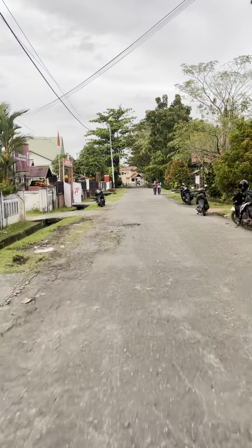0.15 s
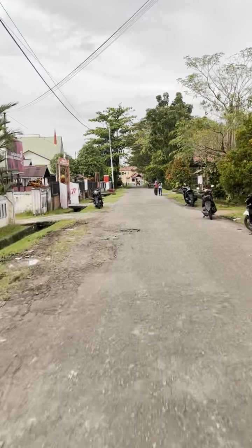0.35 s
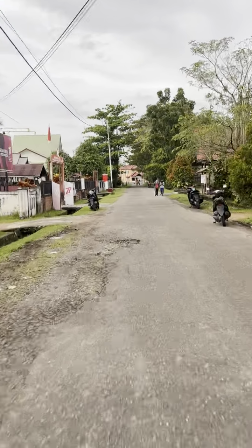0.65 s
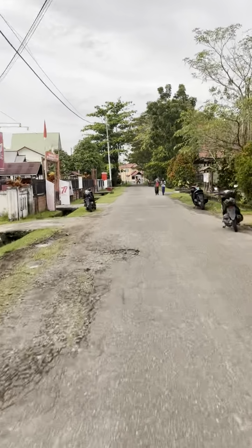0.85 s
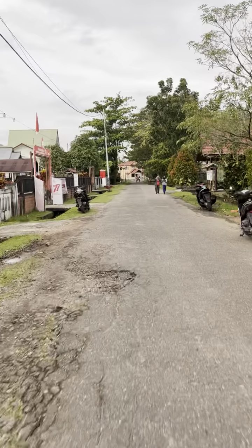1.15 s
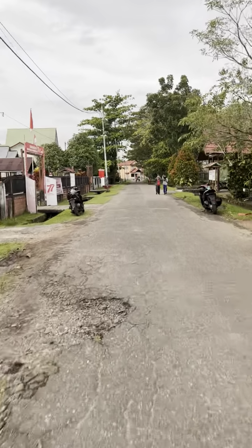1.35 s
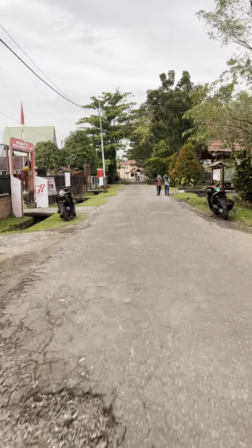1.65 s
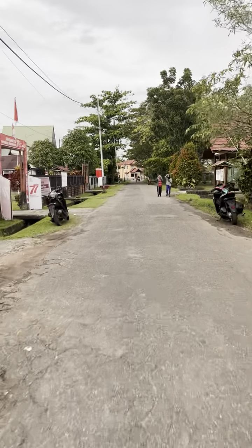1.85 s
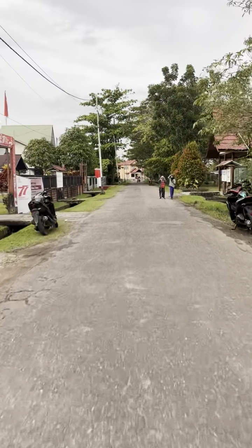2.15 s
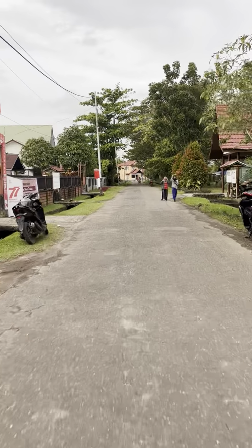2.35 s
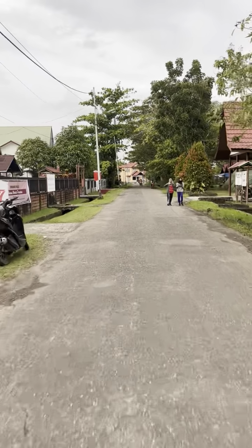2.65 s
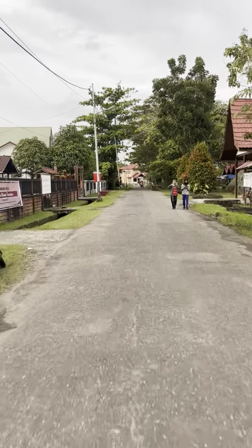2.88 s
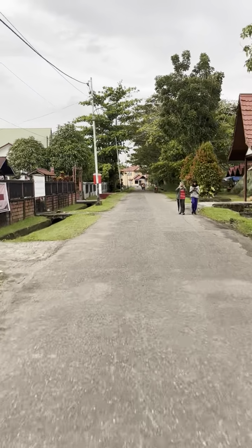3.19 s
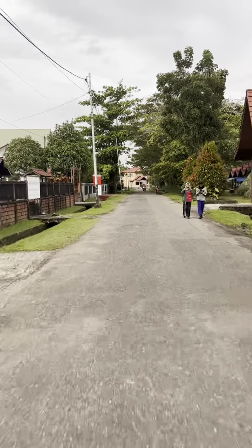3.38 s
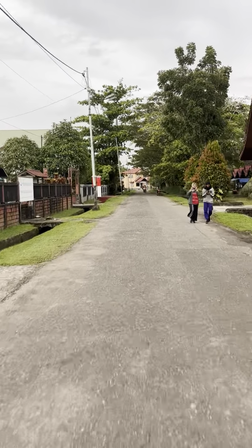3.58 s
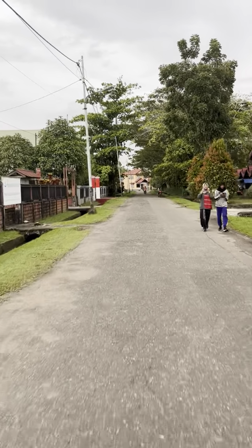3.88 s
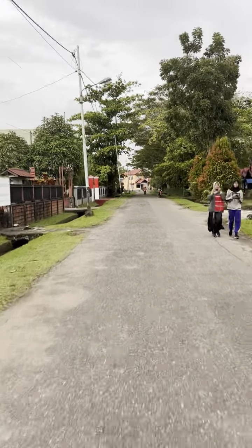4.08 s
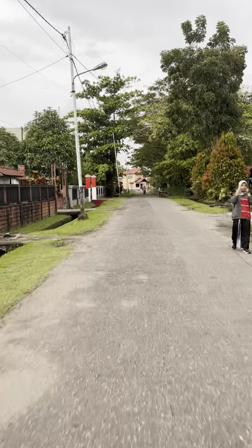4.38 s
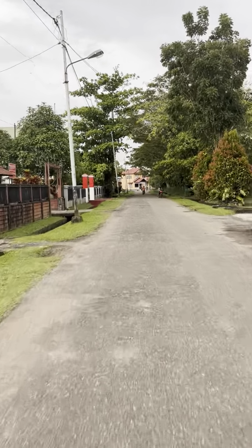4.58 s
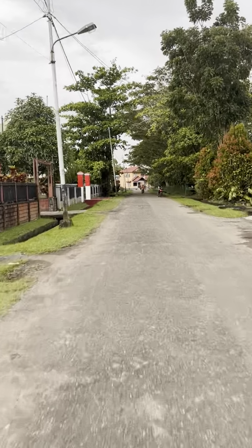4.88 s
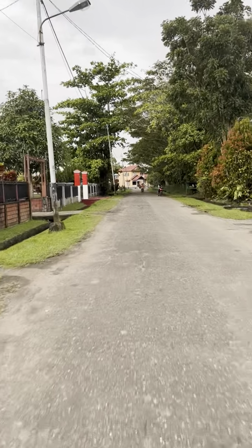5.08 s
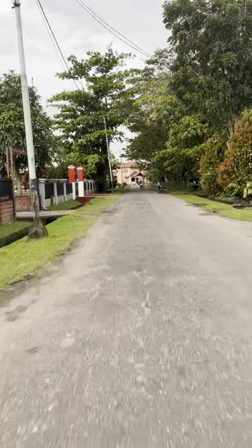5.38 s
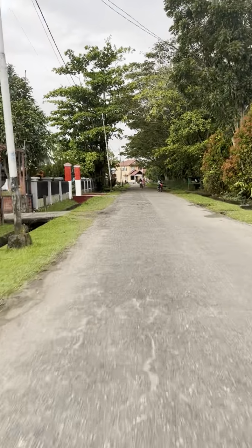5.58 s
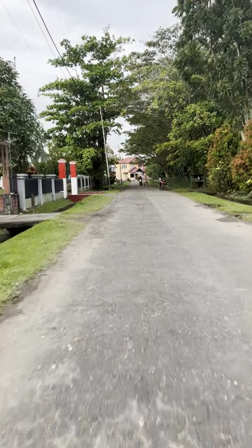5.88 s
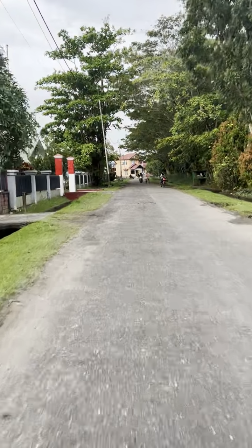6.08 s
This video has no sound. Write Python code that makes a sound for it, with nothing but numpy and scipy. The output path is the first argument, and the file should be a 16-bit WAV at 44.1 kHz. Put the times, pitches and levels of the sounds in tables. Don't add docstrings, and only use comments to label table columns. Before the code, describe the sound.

A small single-cylinder motorcycle is already rolling at 0 s, its fast low putter about 27 firings a second, with a booming drone, a metallic ring near 800-900 Hz, faint whine and steady hiss. Around 0.6 s the throttle closes; the pitch dips and the boom turns more hollow, easing down until about 2 s, when power returns and revs slowly climb. Dull frame thuds cluster near 0.1-0.25, 0.9-1.5 and 3.1-3.9 s, heaviest around 3.74 s, then higher-pitched knocks at 4.2-4.6 s. Lumpy wind rumble swells near 2.9, 3.8 and 4.15 s. From 4.3 to 5 s exhaust and wind drop back, exposing rattle and hiss. The throttle shuts again near 5.3 s, revs dip at 5.6 s and the boom partly returns. Dry grit ticks, brief valve slaps and tiny high tinkles are scattered until the sound stops mid-ride at 6.2 s. Close handheld phone, outdoors, dry stereo.

```python
import sys
import numpy as np
from scipy import signal
from scipy.fft import rfft, irfft
from scipy.io import wavfile
from scipy.ndimage import uniform_filter1d

SR = 44100
rng = np.random.default_rng(int(sys.argv[2]) if len(sys.argv) > 2 else 0)


def wav_record(signal):
    frames = np.transpose(np.atleast_2d(signal))
    bounded = np.clip(frames, -1, 1)
    quanta = np.round(bounded * 32767).astype(np.int16)
    wavfile.write(sys.argv[1], SR, quanta)


def makeup_ratio(level_db):
    decades = np.asarray(level_db, float) / 20
    return 10 ** decades


N = 275184
TIME = np.arange(N) / SR
FREQ = np.maximum(np.arange(N // 2 + 1) * SR / N, 1)
CRUISE_HZ = 27
TWO_PHASES = np.array([[0], [np.pi / 2]])


def columns(table):
    s, *rest = np.transpose(table)
    return [np.interp(TIME, s, c) for c in rest]


def over_freq(hz, value):
    return np.interp(np.log(FREQ), np.log(hz), value)


def unit(x):
    return x / np.sqrt(np.mean(x ** 2))


def colour(x, gain):
    return irfft(rfft(x) * gain, N)


def band(hz, width):
    return 1 / (1 + 1j * (FREQ - hz ** 2 / FREQ) / width)


def die_away(t, t60):
    return np.exp(-np.log(1000) * t / t60)


def walk(rate):
    k = int(SR / rate)
    steps = np.repeat(rng.standard_normal(N // k + 1), k)
    return 1.35 * uniform_filter1d(uniform_filter1d(steps, k), k)[:N]


def patchy(table, shared_db, own_db, rate, gate=1):
    hz, db = np.transpose(table)
    spectrum = rfft(gate * rng.standard_normal((2, N))) * makeup_ratio(over_freq(hz, db))
    out, shared = 0, shared_db * walk(rate)
    for centre in np.arange(np.log2(hz[0]), np.log2(hz[-1]) + .5, .5):
        octaves_off = np.clip(np.log2(FREQ) - centre, -.5, .5)
        share = np.cos(np.pi * octaves_off) ** 2
        out = out + irfft(spectrum * share, N) * makeup_ratio(shared + own_db * walk(rate))
    return unit(out)


def add(out, s, ring):
    i = int(s * SR)
    out[:, i:i + ring.shape[-1]] += ring[..., :N - i]


def follows(hz, effort_db, db, per_hz, per_effort_db, flutter_db):
    return db + per_hz * (hz - CRUISE_HZ) + per_effort_db * effort_db + flutter_db * walk(14)


def wind(gust_db):
    # (frequency [Hz], level per Hz [dB])
    rumble = [(25, -23.5), (45, -4), (90, 2.5), (160, -1.5), (250, -8.5), (340, -5), (480, -14.5),
              (650, -19), (1000, -27)]
    lumps = makeup_ratio(2.2 * walk(55))
    return makeup_ratio(gust_db + 7.5) * patchy(rumble, shared_db=1.0, own_db=0.87, rate=30, gate=lumps)


def grit():
    # (time [s], hiss swell [dB], length [s])
    patches = [
        (0, 3.5, 0.025),
        (0.464, 1.5, 0.023),
        (0.932, 1, 0.19),
        (2.127, 1.5, 0.042),
        (2.863, 0.5, 0.056),
        (4.132, 1.8, 0.052),
        (5.162, 0.8, 0.1),
        (5.47, -2, 0.096),
    ]
    return sum(db * np.exp(-((TIME - s) / length) ** 2) for s, db, length in patches)


def ticks():
    # (time [s], peak level [dB])
    grains = [(0.3331, -32), (0.458, -29), (0.5492, -33), (0.5838, -37), (0.6168, -31), (0.809, -32),
              (0.86, -30), (0.8794, -30), (0.954, -35), (0.9772, -26.5), (1.0147, -29), (1.047, -31),
              (1.1044, -33), (1.1398, -31), (2.0148, -38), (2.0738, -32), (2.2623, -32.5), (2.8614, -27),
              (3.2181, -32), (3.7334, -29), (4.0806, -29), (4.0941, -26), (4.1507, -32), (4.1883, -33),
              (4.5266, -31), (4.561, -30), (4.6324, -27.5), (4.738, -39), (5.157, -30), (5.4031, -37),
              (5.507, -37), (5.5515, -31), (5.5897, -33), (5.665, -27), (5.7209, -30), (5.734, -33),
              (5.8494, -36), (5.9193, -35), (5.958, -30), (6.0302, -36), (6.074, -34), (6.107, -32),
              (6.184, -32)]
    out, t = np.zeros((2, N)), TIME[:SR // 25]
    treble = signal.butter(2, (1600, 6000), "band", fs=SR, output="sos")
    bursts = signal.sosfilt(treble, rng.standard_normal((len(grains), 2, len(t))))
    for (s, db), burst in zip(grains, bursts):
        add(out, s, makeup_ratio(db - 10.5) * die_away(t, t60=0.022) * unit(burst))
    return out


def tinkles():
    # (time [s], peak level [dB], low tone [dB], middle tone [dB])
    strikes = [(0.2088, -51, -13, -15), (0.3576, -35, -22, -16), (0.5985, -53, -14, -11),
               (0.9919, -50, 0, -20), (1.316, -61.5, 0, -28), (2.2752, -52, -18, -25),
               (2.366, -65, -12, -12), (3.4485, -34, -10, -20), (3.7367, -35.5, -5, -23),
               (4.1011, -47, 4, -21.5), (4.2179, -47, 7, -7), (4.2497, -46, 5, -15.5),
               (4.4895, -51, -11, -13), (4.6527, -55, -9, -13), (4.77, -53.5, -13, -27),
               (5.0105, -36, -17, -17), (5.2153, -49, -12, -20), (5.254, -50, 2, -14),
               (5.2909, -39, -6, -23), (5.499, -65, -7, -12)]
    # (frequency [Hz], time to die by 60 dB [s])
    tones = [(7940, 0.04), (13140, .05), (14330, .04), (14620, .045), (14990, .08)]
    out, t = np.zeros((2, N)), TIME[:SR // 6]
    onset = 1 - np.exp(-t / 0.00066)
    phases = 2 * np.pi * rng.random((len(strikes), 5, 2, 1))
    for (s, db, low_db, middle_db), phase in zip(strikes, phases):
        tone_dbs = (low_db, middle_db + 15.0, -6.5, -6.5, -4.5)
        for (hz, t60), tone_db, p in zip(tones, tone_dbs, phase):
            ring = onset * die_away(t, t60) * np.sin(2 * np.pi * hz * t + p)
            add(out, s, makeup_ratio(db + tone_db - 4.5) * ring)
    shiver = makeup_ratio(2.8 * walk(300) + 1.0)
    return out * shiver * np.array([[1], [1.8]])


def knocks():
    # (time [s], peak level [dB], pitch [Hz], crack level [dB])
    road_bumps = [(0.073, -9.5, 272, -15), (0.159, -21.5, 206, -18), (0.234, -7.5, 219, -11.5),
                  (0.498, -18, 195, -21), (0.617, -18, 398, -12), (0.767, -15, 201, -13),
                  (0.877, -8, 272, -22), (0.943, -14, 210, -14), (1.067, -12.5, 281, -18.5),
                  (1.142, -8, 230, -22.5), (1.151, -6, 284, -14.5), (1.16, -11, 251, -13),
                  (1.168, -11, 201, -14), (1.279, -19.5, 189, -21), (1.327, -18.5, 190, -20),
                  (1.379, -19.5, 201, -18), (1.42, -12, 258, -15.5), (1.445, -8, 198, -15),
                  (1.54, -17.5, 199, -18), (1.665, -14, 218, -19), (1.716, -12, 208, -16),
                  (2.057, -15.5, 213, -7), (2.085, -13.5, 230, -18), (2.2, -19, 213, -14.5),
                  (2.248, -17, 241, -10.5), (2.671, -18, 297, -14.5), (2.471, -16, 189, -16),
                  (2.741, -8.5, 262, -27), (2.794, -17, 218, -18.5), (2.919, -22, 195, -19),
                  (3.076, -6.5, 235, -18), (3.11, -10.5, 225, -14), (3.382, -15.5, 303, -19.5),
                  (3.451, -13, 227, -21), (3.541, -18.5, 190, -18), (3.596, -7.5, 256, -24),
                  (3.737, -8, 301, -14.5), (3.743, -1.5, 231, -23), (3.795, -10.5, 186, -22.5),
                  (3.867, -18.5, 309, -16), (3.903, -10.5, 235, -15)]
    # (time [s], peak level [dB], pitch [Hz], crack level [dB])
    rut_bumps = [(4.015, -19, 200, -16), (4.045, -10, 220, -16), (4.239, -5.5, 246, -12.5),
                 (4.281, -13, 288, -6), (4.309, -13, 447, -21), (4.312, -14, 400, -21),
                 (4.317, -2.5, 434, -16), (4.33, -14, 430, -15), (4.391, -8, 633, -16),
                 (4.405, -16, 480, -13), (4.485, -23, 330, -15), (4.522, -17.5, 334, -19),
                 (4.566, -13, 341, -9), (4.577, -13, 321, -10), (4.588, -14, 246, -12),
                 (5.076, -20.5, 247, -13), (5.151, -12.5, 294, -8.5), (5.225, -17, 390, -18),
                 (5.37, -18, 298, -20), (5.475, -20, 190, -18), (5.518, -8.5, 217, -13),
                 (6.025, -21, 395, -17), (6.061, -14.5, 350, -19)]
    bumps = road_bumps + rut_bumps
    out, t = np.zeros((2, N)), TIME[:SR // 10]
    phases = 1.27 + .3 * rng.standard_normal((len(bumps), 1, 1)) - TWO_PHASES
    noise = rng.standard_normal((len(bumps), 2, 2, len(t)))
    crack_band = signal.butter(3, (500, 1000), "band", fs=SR, output="sos")
    rattle_band = signal.butter(2, (190, 800), "band", fs=SR, output="sos")
    cracks = signal.sosfilt(crack_band, noise[:, 0])
    rattles = signal.sosfilt(rattle_band, noise[:, 1])
    for (s, db, hz, crack_db), phase, crack, rattle in zip(bumps, phases, cracks, rattles):
        shape = (1 - np.exp(-t * hz / 0.78)) ** 2 * die_away(t, t60=5 / hz)
        shape = shape / shape.max()
        turns = hz * (t + 0.0015 * (1 - np.exp(-t / 0.0013)))
        thud = np.sin(2 * np.pi * turns + phase) + makeup_ratio(crack_db + 2.0) * unit(crack)
        after = makeup_ratio(-10.5) * shape ** 0.3 * unit(rattle)
        add(out, s, makeup_ratio(db - 4.5) * (shape * thud + after))
    return colour(out, 1 / (1 + (FREQ / 1050) ** 6))


def slaps():
    # (time [s], peak level [dB], pitch [Hz])
    loud_slaps = [(0.734, -24, 851), (0.949, -27, 797), (1.403, -20.5, 780), (1.518, -25, 873),
                  (1.562, -27, 873), (2.029, -24, 820), (2.132, -23, 802), (2.344, -24.5, 837),
                  (2.451, -21, 818), (2.49, -24.5, 813), (2.575, -27, 878), (2.658, -26, 799),
                  (2.713, -30, 890), (3.627, -31, 700), (3.849, -25.5, 817), (3.924, -23.5, 820),
                  (3.985, -27.5, 754), (4.026, -23.5, 812), (4.882, -26, 800), (5.026, -26, 840),
                  (6.075, -26, 896), (6.175, -24, 880)]
    out, t = np.zeros((2, N)), TIME[:SR // 12]
    shape = (1 - np.exp(-t / 0.00062)) * die_away(t, t60=0.063)
    shape = shape / shape.max()
    phases = 2 * np.pi * rng.random((len(loud_slaps), 1, 1)) - TWO_PHASES
    for (s, db, hz), phase in zip(loud_slaps, phases):
        add(out, s, makeup_ratio(db - 1.0) * shape * np.sin(2 * np.pi * hz * t + phase))
    return out


def taps(cycle):
    landing = cycle - 2.1
    return unit(sum(np.cos(k * landing - TWO_PHASES + .5 * walk(9)) for k in range(28, 42)))


def whine(cycle, order, blur_hz):
    noise = rng.standard_normal((2, 2, N))
    slow = colour(noise, 1 / (1 + (FREQ / blur_hz) ** 2))
    return unit(slow[0] * np.cos(order * cycle) + slow[1] * np.sin(order * cycle))


def case_ring(cycle, throttle, revs, rattle):
    # (frequency [Hz], width [Hz], level [dB], level per Hz of revs [dB])
    walls = [(812.8, 74, 3, 0), (906.4, 60, -1.5, -0.3), (990, 75, -7.5, 1)]
    struck = unit(rattle) + makeup_ratio(-25.5) * taps(cycle)
    ring = 0
    for hz, width, db, per_hz in walls:
        level_db = db + per_hz * (revs - CRUISE_HZ) + 0.6 * walk(9.1)
        ring = ring + makeup_ratio(level_db) * unit(colour(struck, band(hz, width) ** 2))
    chain_db = -4.0 - 4.5 * throttle - 4.4 * (revs - 27.5)
    ring = ring + makeup_ratio(chain_db) * np.cos(34 * cycle + 1.3 * walk(12))
    ring = ring * (1 - (.13 - 0.12 * throttle) * np.cos(cycle + 0.34))
    return unit(ring)


def cooling_fins(throttle, revs, rattle):
    # (frequency [Hz], width [Hz], level [dB])
    fin_tones = [(1940, 66, -12.5), (3282, 150, -9), (3407, 51, -11), (3974, 100, -8.5), (4370, 300, -11.5)]
    fins = 0
    for hz, width, db in fin_tones:
        fins = fins + makeup_ratio(db + 0.27 * walk(17.0)) * unit(colour(rattle, band(hz, width) ** 2))
    return fins * makeup_ratio(1.0 * (revs - 29.5) - 1.5 * (1 - throttle))


def engine_case(cycle, throttle, ring_db, hiss_db, gear_db):
    # (frequency [Hz], level per Hz [dB])
    hiss_curve = [(500, 10.5), (1100, 6), (1500, 0.5), (2500, -2.5), (3600, -5.5), (4500, -12.5),
                  (6000, -12.5), (8000, -19.5), (10000, -22), (12000, -21), (15600, -28.5), (16000, -56)]
    beat = 1 - 0.056 * np.cos(cycle + 0.34) + 0.077 * np.cos(2 * cycle + 0.4)
    rattle = beat ** 2 * makeup_ratio(2.1 * walk(70)) * rng.standard_normal((2, N))
    revs = np.gradient(cycle) * SR / (2 * np.pi)
    ring = case_ring(cycle, throttle, revs, rattle)
    fins = cooling_fins(throttle, revs, rattle)
    gear_level = makeup_ratio(1.2 * (gear_db - np.mean(gear_db)) - 55.5)
    gear = gear_level * beat * whine(cycle, order=80.5, blur_hz=60)
    puffs = beat * makeup_ratio(0.95 * walk(220))
    hiss = patchy(hiss_curve, shared_db=-0.5, own_db=0.74, rate=18, gate=puffs)
    return makeup_ratio(ring_db + 3.5) * ring + makeup_ratio(hiss_db) * (makeup_ratio(9.0) * hiss + fins) + gear


def order_levels(hz, throttle, effort_db):
    # (order, level shut [dB], level open [dB], level per Hz of revs [dB])
    strong_orders = [(2, -27.5, -23, 1.4), (3, -17.5, -34.5, -2), (4, -12.5, -20.5, 1.13),
                     (5, -20, -17.5, -1.5)]
    order_flutter = 1.5, 2.2, 1.2, .9
    levels = []
    for (_, shut, wide, per_hz), flutter_db in zip(strong_orders, order_flutter):
        db = shut + (wide - shut) * throttle
        levels.append(follows(hz, effort_db, db, per_hz, 1, flutter_db))
    return levels


def exhaust(cycle, throttle, order_db, waver):
    # (order, level below order 5 when open [dB], extra level when shut [dB])
    weak_orders = [(1, -29.5, 1.5), (6, -13.5, 1.5), (7, -23, 10.5), (8, -28, 5.5), (12, -20, -4)]
    levels = list(zip((2, 3, 4, 5), order_db))
    for k, db, shut_db in weak_orders:
        levels.append((k, order_db[3] + db + shut_db * (1 - throttle)))
    lag = np.interp(throttle, (0, 1), (.5, -.7))
    out = 0
    for k, db in levels:
        fan = (k - 4) ** 2 * (k > 2) + 2.6
        level = np.sqrt(2) * makeup_ratio(db + 0.21 * walk(22))
        out = out + level * np.cos(k * cycle - lag * fan + waver * walk(20))
    return out


def ports(pair):
    # (frequency [Hz], likeness [0-1], left lead [rad], left minus right [dB])
    port_curve = [(100, .93, .32, 2.6), (200, .9, .2, 2.6), (340, .35, .7, -.5), (600, .8, 2.5, 0),
                  (900, .25, 2.2, 1.5), (1200, .2, 2.5, 4), (1400, .3, -.5, 1), (2100, .78, .4, 0),
                  (2800, .5, 2, -2.5), (4000, .68, 0, -1.5), (4800, .4, 1.2, 0), (6300, .82, 3.14, 0),
                  (9100, .93, 6.28, 0), (12350, .86, 9.42, 0), (15600, .9, 12.56, 0)]
    hz, *rest = np.transpose(port_curve)
    alike, lead, tilt_db = (over_freq(hz, c) for c in rest)
    alike = np.clip(alike, 0, 1)
    fade = np.clip(np.minimum(TIME / .0002, TIME[::-1] / .004), 0, 1)
    common, other = rfft(pair * fade) * np.sqrt([(1 + alike) / 2, (1 - alike) / 2])
    turn = np.exp(.5j * lead) * makeup_ratio(tilt_db / 2)
    return irfft(np.array([(common + other) * turn, (common - other) / turn]), N)


def scene():
    # (time [s], firing rate [Hz])
    rev_curve = [(0, 28), (.5, 28.5), (.6, 27.4), (.73, 24.9), (.81, 27.6), (1.1, 26.9), (1.6, 25.6),
                 (1.97, 25.1), (2.11, 27.3), (2.19, 25.7), (2.6, 25.95), (3.4, 27), (4.2, 27.85),
                 (5.27, 28.65), (5.45, 28), (5.58, 25.8), (5.69, 27.7), (6.24, 26.5)]
    # (time [s], gust level [dB])
    gust_curve = [(0, -27.5), (.45, -26.5), (1.5, -30), (1.85, -32), (2.15, -27), (2.45, -31.5), (2.9, -25),
                  (3.2, -30.5), (3.45, -27), (3.84, -25), (4.0, -29.5), (4.16, -23), (4.34, -32),
                  (5.05, -36), (5.3, -28.5), (5.6, -28), (5.9, -29.5), (6.24, -26)]
    # (time [s], throttle opening [0-1], exhaust effort [dB])
    hand = [(0, .95, -0.3), (.55, .9, 0), (.64, .05, 0), (1.2, 0.06, -0.5), (1.75, 0.1, -3),
            (1.95, 0.91, -1), (3, .95, 0.5), (4.18, .9, -1.6), (4.33, 0.97, -11.5), (4.8, .9, -13.5),
            (5.05, .8, -6.5), (5.27, 0.1, -5.5), (5.52, 0.2, -8.5), (5.68, .05, -2.3), (6.05, 0, -2.4),
            (6.24, 0.2, -3)]
    hz, = columns(rev_curve)
    gust_db, = columns(gust_curve)
    throttle, effort_db = columns(hand)
    throttle = np.clip(throttle, 0, 1)
    shut = 1 - throttle

    steady_hz = uniform_filter1d(hz, size=SR // 2)
    ring_db = follows(steady_hz, effort_db, db=-37, per_hz=-1.2, per_effort_db=0.05, flutter_db=0.94)
    hiss_db = follows(steady_hz, effort_db, db=-45, per_hz=0.64, per_effort_db=0.045, flutter_db=0.35)
    gear_db = follows(steady_hz, effort_db, db=-52, per_hz=-0.5, per_effort_db=-0.45, flutter_db=-2)
    hiss_db = hiss_db + grit() * (1 + 1.1 * walk(150))
    cycle = 2 * np.pi * np.cumsum(hz) / SR
    engine = engine_case(cycle, throttle, ring_db, hiss_db, gear_db - 3.2 * shut)

    order_db = order_levels(hz, throttle, effort_db)
    pipe = cycle + 2 * np.pi * .165 * shut
    shared = exhaust(pipe, throttle, order_db, waver=.13)
    unshared = 0.77 * exhaust(pipe, throttle, order_db, waver=2.5)
    boom = np.array([shared, unshared])
    return ports(wind(gust_db) + ticks() + tinkles() + knocks() + slaps() + engine + boom)


def steer(pair, size=2048, count=16):
    # (frequency [Hz], share of the band's mean power below which lines drop [0-1])
    thin_share = [(1000, 0), (3000, .2), (5000, .35), (7500, .5), (10000, .55), (14000, .6)]
    margin = [(5500, -8), (6800, -6.5), (8000, -5), (13000, -3.5), (16000, -6)]  # (Hz, dB)
    mid_side = np.array([pair[0] + pair[1], pair[0] - pair[1]]) / 2
    hz, _, z = signal.stft(mid_side, SR, "cosine", size, boundary="even")
    power = np.abs(z[:, :-1]) ** 2
    band_power = power.reshape(2, -1, count, z.shape[-1]).mean(axis=2)
    bands = np.repeat(band_power, count, axis=1)
    weak_db = np.interp(hz[:-1, None], *np.transpose(margin), left=-99)
    waver = rng.standard_normal((size // 2 // count, z.shape[-1]))
    weak_db = weak_db + 2.5 * np.repeat(waver, count, axis=0)
    z[:, :-1] *= bands > bands[::-1] * makeup_ratio(2 * weak_db)
    floor = bands * np.interp(hz[:-1, None], *np.transpose(thin_share))
    z[:, :-1] *= uniform_filter1d(power, size=3, axis=1) > floor
    z[:, hz > 15790] = 0
    mid, side = signal.istft(z, SR, "cosine", size)[1]
    return np.array([mid + side, mid - side])


def roll_off(x):
    return signal.sosfilt(signal.butter(12, 16800, fs=SR, output="sos"), x)


def record(dry):
    lead = 775
    rounded = np.tanh(.75 * dry) / .75
    padded = np.pad(rounded, ((0, 0), (lead, 0)), "reflect")
    finished = steer(padded)[:, lead:lead + N]
    return roll_off(finished)


dry = scene()
out = record(dry)
wav_record(out)
```